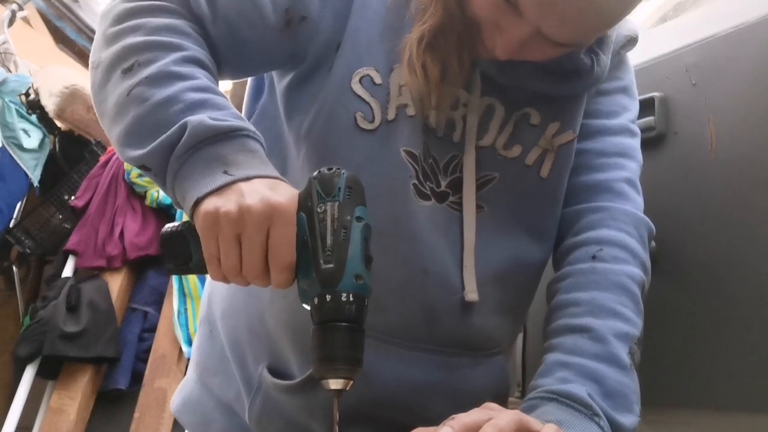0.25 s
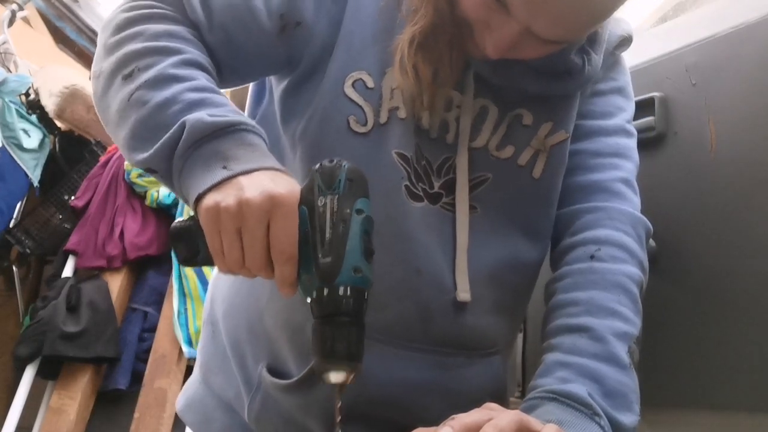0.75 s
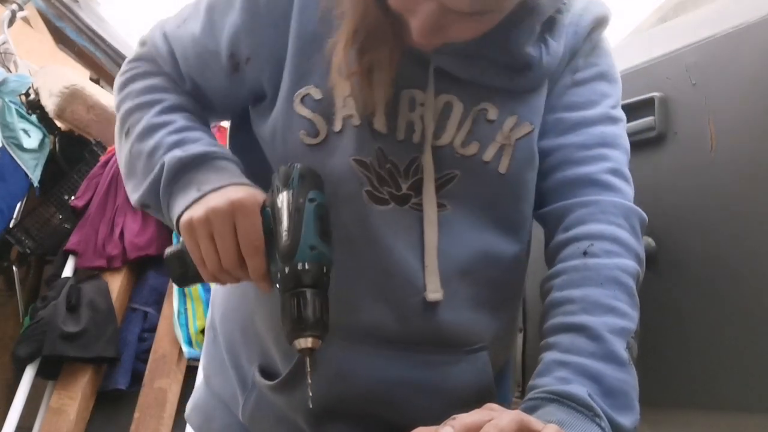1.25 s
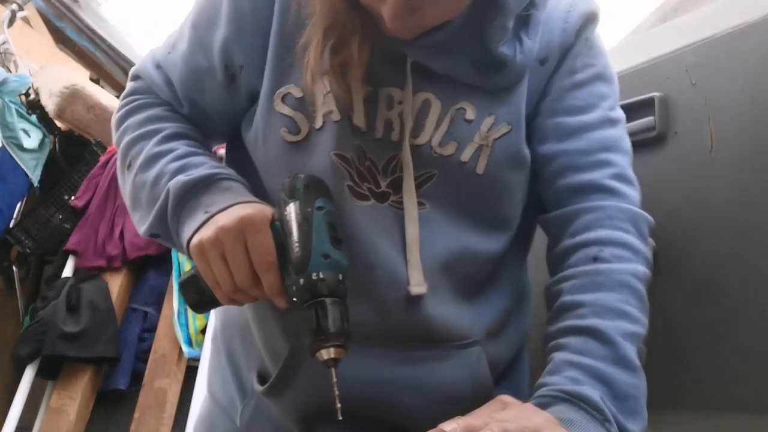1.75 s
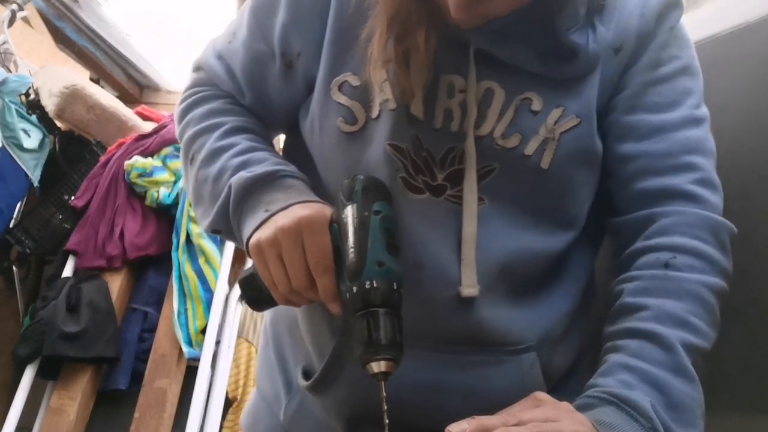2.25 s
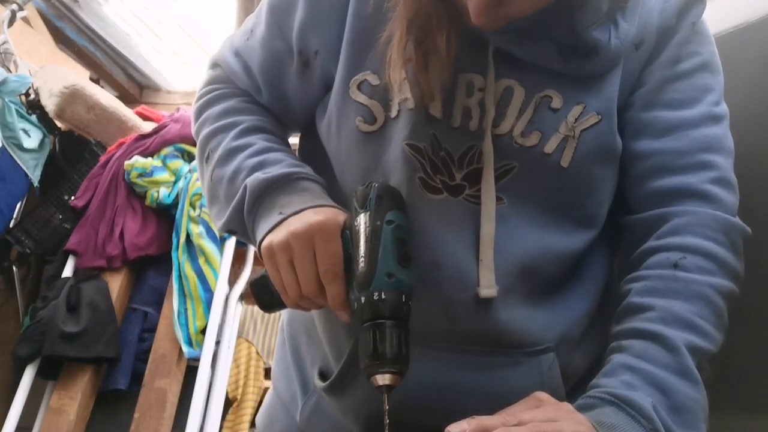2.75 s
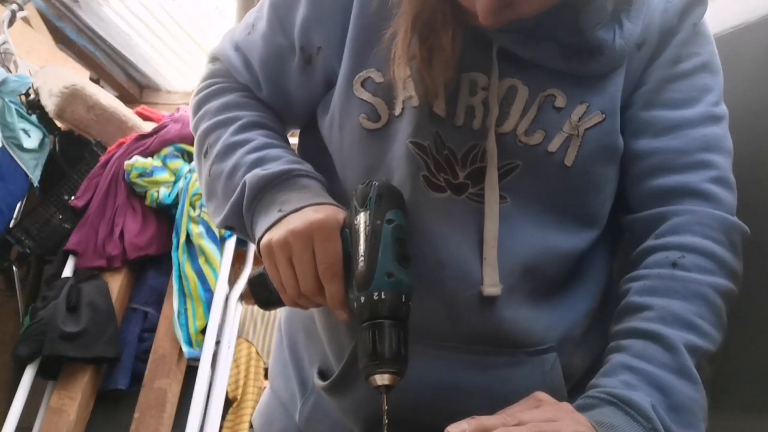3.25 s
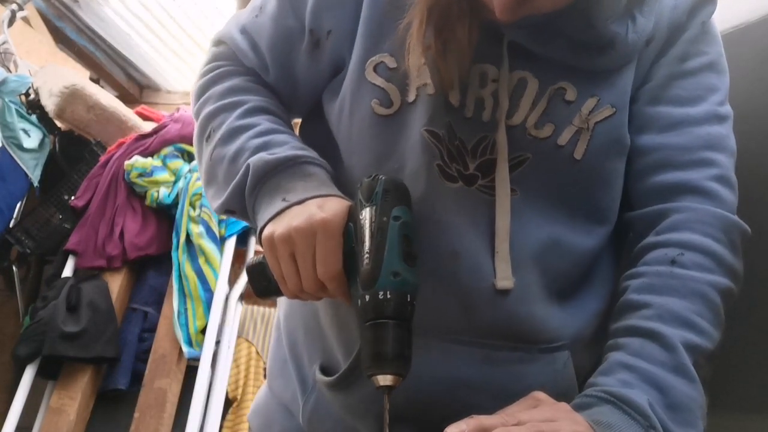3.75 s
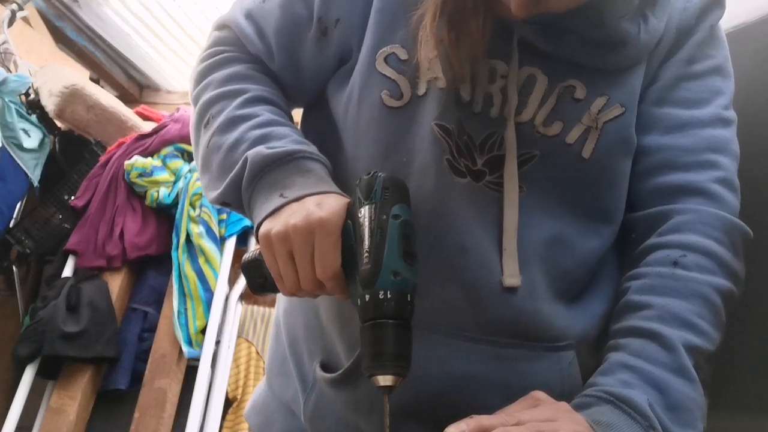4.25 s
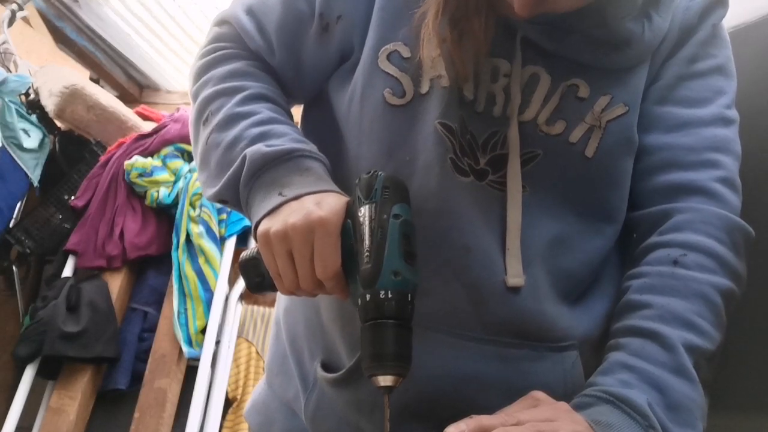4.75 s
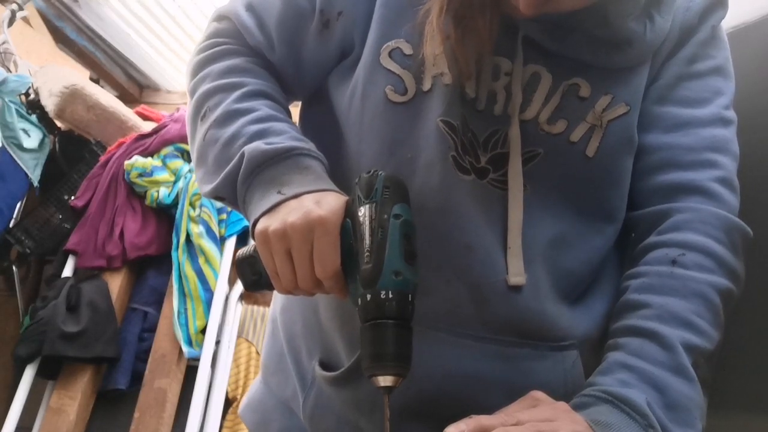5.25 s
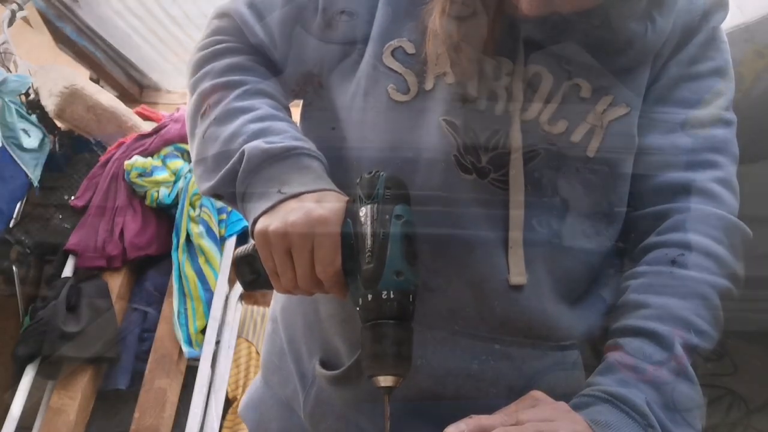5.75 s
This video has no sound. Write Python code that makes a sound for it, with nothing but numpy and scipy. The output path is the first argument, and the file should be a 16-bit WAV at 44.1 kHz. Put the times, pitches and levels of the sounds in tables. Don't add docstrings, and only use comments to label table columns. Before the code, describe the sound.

A hand drill blips three times against a metal panel, rests amid faint handling noises, then whines, skates and bites into the steel.

```python
import sys
import numpy as np
from scipy import signal
from scipy.fft import rfft, irfft, next_fast_len
from scipy.io import wavfile
from scipy.ndimage import uniform_filter1d

SR = 44100
rng = np.random.default_rng(int(sys.argv[2]) if len(sys.argv) > 2 else 0)


def store_wav(level_fs):
    pcm = np.round(np.clip(np.atleast_2d(level_fs), -1, 1) * 32767)
    wavfile.write(sys.argv[1], SR, pcm.T.astype(np.int16))


def convert_level_to_amplitude(level_db):
    exponent = np.asarray(level_db, float) / 20
    return 10 ** exponent


N = 265482
T = np.arange(N) / SR

# pull in seconds, release in seconds.
PULLS = [
    (.036, .264),
    (.343, .572),
    (.668, .897),
    (3.806, 6.1),
]
# lead over the pull in seconds, hiss level in dB, rise in seconds,
# panel rumble over the hiss in dB, fall after release in dB per second.
PULL_NOISE = [
    (-0.0014, -46.5, 0.053, 5, 610),
    (0.0096, -46.5, 0.044, 7, 333),
    (-0.01, -46.5, 0.04, 7, 339),
    (0.0048, -45.5, 0.11, -18.5, 500),
]
FREE_REV_PER_S, RUN_UP_S, BRAKE_REV_PER_S2 = 292, .066, 750
BLIPS_END_S, BITES_S = 2, 5.07

# time in seconds, pitch of three beats a turn in Hz, its level in dB.
ROTOR_LOADED = [(3.87, 852, -70), (3.91, 852, -55), (4.03, 848, -55), (4.15, 846, -48), (4.42, 835, -50),
                (4.65, 808, -55.5), (5.02, 785, -54.5), (5.25, 804, -63), (6.02, 779, -65)]
# beats a turn, level over the three-beat tone in dB, roughness as a share.
ROTOR_TONES = [(21, -9, .8), (6, -14, .6)]
# start, peak and end in seconds, level in dB.
ROTOR_WOBBLES = [
    (.87, 0.907, 1.085, -51.5),
    (4.847, 5.328, 6.4, -54.5),
]
# time in seconds, pitch in Hz, level in dB.
GEAR_MESH = [(3.92, 572, -62), (3.97, 579, -49.5), (4.12, 588, -47.5), (4.4, 580, -50), (4.7, 571, -50),
             (5.03, 561, -53), (5.1, 566, -61), (5.4, 580, -61), (6.02, 556, -68)]
# multiple of the mesh pitch, level in dB, roughness as a share.
GEAR_TONES = [(2.01, -1, .6), (2.5, 0, .3), (3, 1.5, .4), (3.43, .5, .35)]
GEAR_RATIO, GEAR_UPPER_DB = 8, -5
# beats a turn, mode in Hz, width in Hz, level in dB.
HOUSING_MODES = [(9, 1930, 63, -37.5), (9, 1300, 87, -82), (3, 650, 98, -51), (1, 330, 19, -18)]
MODE_PULL = .7

# pitch in Hz, level in dB per Hz.
BLIP_BODY = [(65, 6), (110, -4), (188, -11.5), (305, -2), (396, -9.5), (469, -17.5), (528, -4), (642, -15),
             (834, -5.5), (1110, -11.5), (1560, -13.5), (1920, -8), (2500, -15.5), (3250, -42),
             (5500, -120)]
# pitch in Hz, level in dB per Hz.
SKATE_BODY = [(110, 0), (150, -15), (300, -9), (450, -19), (600, -3.5), (700, -11.5), (1030, -8),
              (1200, -6.5), (1600, -2.5), (1800, 0.5), (2000, -1.5), (2170, -4.5), (2500, -6.5),
              (3200, -28)]
# pitch in Hz, level in dB per Hz.
BITE_BODY = [(65, -32), (110, 4.5), (160, -1.5), (210, -9), (271, -2), (380, -5), (469, -16), (571, -8),
             (651, -12.5), (792, -3.5), (976, -8.5), (1710, -3.5), (2500, -4.5), (3250, -50), (5500, -120)]
# pitch in Hz, level in dB per Hz.
BLIP_HISS = [(1470, -25), (2500, -2), (2740, 1.5), (3430, -6), (3850, 0.5), (4700, -1.5), (5190, -1.5),
             (5960, -5), (8690, -5), (10100, -19.5), (11500, -17), (12900, -17), (14200, -13), (15100, -15),
             (15700, -8.5)]
# pitch in Hz, level in dB per Hz.
BORE_HISS = [(1470, -37), (2500, -4.5), (2960, 0), (3220, -7), (3900, 0.5), (4420, -2.5), (5030, -2),
             (6150, -4), (7170, -2.5), (7800, -5), (8490, -3), (10400, -18.5), (15100, -14), (15700, -9)]
AIR_DB = [
    -5,
    -4,
    -3,
]
AIR_LAG_RISES, AIR_LAG_DB, AIR_RELEASE_DB = 0.56, -7, -6
BODY_DB = [
    3,
    0,
    -2.5,
]
RUN_UP_BODY_DB, RUN_UP_RUMBLE_DB = 6, 9
PRESS_SHARE = 0.24
BITE_RUMBLE_DB = 7
LIFT_S, LIFT_DB_PER_S, LIFT_BODY_SHARE = 0.763, 93, 0.31
FADE_S, FADE_DB_PER_S = 5.44, 10.5
CREEP_DB = -69

# start and end in seconds, pitch in Hz, level in dB, wobble in Hz.
SQUEALS = [(3.95, 4.05, 2400, -57, 12), (4.1, 4.78, 8235, -57, 15), (4.65, 4.92, 7500, -59, 20),
           (4.75, 5.25, 4905, -53, 7), (5.1, 5.6, 7500, -59, 15), (5.12, 5.55, 7670, -61, 12),
           (5.2, 5.48, 2397, -57, 15), (5.1, 5.75, 2908, -60, 20), (5.45, 6.3, 4920, -57, 8),
           (4.6, 5.4, 5230, -61, 20), (5.05, 5.4, 4825, -60, 15), (4.55, 4.8, 4930, -58, 12)]
# start and length in seconds, pitch in Hz, level in dB.
CHIRPS = [(.49, .04, 13800, -59), (.51, .04, 14800, -53), (.105, .04, 13800, -55), (.1, .04, 5500, -56),
          (.59, .025, 3750, -54), (.19, .03, 14800, -56), (.715, .02, 15000, -57), (.86, .015, 14900, -55),
          (.49, .025, 850, -49), (.095, .025, 1680, -49), (.235, .015, 4100, -53)]
CHIRP_WOBBLE_HZ, SQUEAL_SAG = 180, .006

# time in seconds, peak in dB, lowest and highest Hz, rise in milliseconds.
KNOCKS = [(.678, -48, 600, 6000, 1), (.885, -38, 1500, 10000, 3), (1.621, -46, 600, 3200, .4),
          (1.621, -62, 4000, 15000, .4), (2.003, -53.5, 4200, 8500, 6), (2.161, -43, 1000, 12000, 7),
          (2.167, -52, 200, 400, 10), (2.2, -51, 2300, 3500, 6), (2.202, -53, 5500, 16000, 5),
          (2.501, -65, 4000, 6500, 1), (3.822, -51, 1000, 12000, 1), (5.069, -40, 8000, 15500, 4),
          (5.4, -41, 13000, 15500, 4), (5.661, -39, 5000, 15000, 4), (1.422, -69, 5000, 8000, 1),
          (3.771, -68, 7800, 9200, 1), (.258, -42, 2000, 9000, 2), (.598, -47, 2500, 9500, 2),
          (.443, -33, 150, 900, 1), (.501, -36, 400, 6000, 1), (3.51, -74, 5000, 14000, 1)]
KNOCK_T60_S = 0.087
CRACK_GAIN, CRACK_S = 1.3, .002
# middle and length in seconds, level in dB.
BRUSHES = [(1.444, .05, -73), (1.586, .04, -80), (1.751, 0.33, -83), (1.929, 0.065, -68.5),
           (2.03, 0.085, -68), (2.129, 0.15, -69), (2.212, 0.027, -64), (2.5, 0.039, -78),
           (3.16, 0.041, -82), (3.51, .05, -85)]
# pitch in Hz, level in dB per Hz.
CLOTH_COLOUR = [(700, 4), (2500, 6), (5000, 2), (9000, 1), (10000, -8), (11500, -4), (13000, -6),
                (15700, -6)]
CLOTH_DB = -80.5

# time in seconds, pitch in Hz, level in dB.
ENGINE = [(0, 87.6, -49), (.2, 90.8, -60), (.53, 66.2, -55.5), (.82, 72.6, -62.5), (1.09, 74.3, -50),
          (1.28, 64.8, -53), (1.39, 65.4, -66), (1.48, 61.4, -53.5), (2.1, 56.8, -62.5), (2.43, 56, -51),
          (2.75, 56.26, -48.5), (3.82, 56.1, -62.5), (3.97, 65, -66), (4.19, 72.5, -54.5),
          (4.43, 67.5, -60.5), (5.25, 68, -49), (5.5, 67.3, -60), (5.85, 66.5, -52)]
# pitch in Hz, level in dB per Hz.
ROOM_COLOUR = [(53, 8), (90, 1), (249, 1), (322, -2), (383, -3), (466, -7.5), (591, -2.5), (702, -4.5),
               (765, -1), (1740, -4.5), (2260, -10), (4410, -13), (5000, -13.5), (5900, -25.5), (7400, -28),
               (8700, -21.5), (9800, -29), (15800, -48)]
ROOM_DB, ENGINE_THROB_DB, RUMBLE_DB, RUMBLE_SWING_DB = -63, 1.5, -61, 3

# pitch in Hz, level in dB per Hz.
CIRCUIT_COLOUR = [(30, 0.0), (59, -2.4), (119, -5.8), (238, -10.4), (474, -14.0), (947, -18.4),
                  (1889, -21.8), (3769, -27.5), (7519, -35.7), (15000, -31.2)]
CIRCUIT_DB, DUCK_DB, DUCK_S = -76.5, -5.5, .12
# pitch in Hz, level in dB per Hz.
NEXT_COLOUR = [(15, -12), (35, -2), (60, -3), (120, -9), (240, -13), (470, -22), (900, -20), (1900, -25.5),
               (4500, -30), (5300, -37), (9000, -39), (15000, -50)]
# time in seconds, level in dB.
NEXT_THUDS = [
    (5.925, -35),
    (5.96, -37),
    (5.996, -35),
]
NEXT_S, NEXT_FIRST_DB, NEXT_DB, NEXT_RISE_S = 5.7, -53, -45.5, .08


def whine():
    rev = rotor_speed()
    third_db = in_time(ROTOR_LOADED, -120)[1]
    out = convert_level_to_amplitude(third_db) * tone(3 * rev + 5 * drift(10), rough=.2)
    for start, peak, end, db in ROTOR_WOBBLES:
        swell = np.interp(T, [start, peak, end], [0, 1, 0]) ** 2
        out += convert_level_to_amplitude(db) * swell * tone(rev, rough=0.3)
    for order, db, rough in ROTOR_TONES:
        out += convert_level_to_amplitude(third_db + db) * tone(order * rev, rough)

    mesh = in_time(GEAR_MESH)[0] + 4 * drift(12)
    mesh_db = in_time(GEAR_MESH, -120)[1]
    beat = np.cos(2 * np.pi * np.cumsum(rev) / GEAR_RATIO / SR + drift(1.9))
    upper_db = mesh_db + GEAR_UPPER_DB + 3 * beat
    out += convert_level_to_amplitude(mesh_db + 2.5 * beat) * tone(mesh + 3 * drift(10), rough=.26)
    for multiple, db, rough in GEAR_TONES:
        out += convert_level_to_amplitude(upper_db + db) * tone(multiple * mesh, rough)

    driven = uniform_filter1d((since_pull()[2] == 0) * 1., size=400)
    driven = driven * np.where(T < BLIPS_END_S, 1, convert_level_to_amplitude(-3.5))
    for order, hz, width, db in HOUSING_MODES:
        push = order * rev
        nearness = np.exp(-((push - hz) / width) ** 2)
        out += convert_level_to_amplitude(db) * driven * nearness * tone(push + MODE_PULL * (hz - push), rough=0.1)
    return out


def rotor_speed():
    k, age, coasting = since_pull()
    top = np.where(T < BLIPS_END_S, FREE_REV_PER_S, in_time(ROTOR_LOADED)[0] / 3)
    run_up = 1 - np.exp(-np.maximum(age, 0) / RUN_UP_S)
    return np.maximum(top * run_up - BRAKE_REV_PER_S2 * coasting, 0)


def since_pull():
    pull, release = np.transpose(PULLS)
    k = np.maximum(np.searchsorted(pull, T + .03) - 1, 0)
    return k, T - pull[k], np.maximum(T - release[k], 0)


def stage():
    return (T >= BLIPS_END_S) * 1 + (T >= BITES_S)


def grind():
    blip = T < BLIPS_END_S
    turn = 1 + 0.022 * np.cos(2 * np.pi * np.cumsum(rotor_speed()) / SR)
    contacts = rng.standard_normal(N) * convert_level_to_amplitude(1.3 * rng.exponential(1, N)) * turn
    contacts = sheet_modes(contacts, depth_db=2.1, width_hz=60)
    low_bore = np.where(T < BITES_S, coloured(contacts, SKATE_BODY), coloured(contacts, BITE_BODY))
    low = np.where(blip, coloured(contacts, BLIP_BODY), low_bore)
    high = np.where(blip, coloured(contacts, BLIP_HISS), coloured(contacts, BORE_HISS))
    hiss_db, air_db, body_db, rumble_db = noise_levels()
    shake_db = np.where(blip, 1.5, .5) * drift(32)
    ranges = [(air_db, high, 9500, 16500, 4), (0, high, 2500, 9500, 6),
              (body_db, low, 500, 2500, 4), (rumble_db, low, 110, 500, 2)]
    out = 0
    for db, source, low_hz, high_hz, count in ranges:
        edges = np.geomspace(low_hz, high_hz, count + 1)
        part = 0
        for k, (a, b) in enumerate(zip(edges, edges[1:])):
            flicker = convert_level_to_amplitude(np.where(blip, 1.6, .55) * drift(5.6))
            part = part + flicker * band(source, a, b) * (-1) ** k
        usual = np.array([part[stage() == k].std() for k in range(3)])
        out = out + convert_level_to_amplitude(hiss_db + db + shake_db) * part / usual[stage()]
    return out


def noise_levels():
    k, age, coasting = since_pull()
    lead, db, rise, rumble_db, release = np.array(PULL_NOISE)[k].T
    age = np.maximum(age + lead, 0)
    blip = T < BLIPS_END_S

    swell = 1 - np.exp(-(age / rise) ** np.where(blip, 1.7, 1))
    fade_db = FADE_DB_PER_S * np.maximum(T - FADE_S, 0)
    hiss_db = db + 20 * np.log10(swell + 1e-6) - release * coasting - fade_db
    tails = [np.where(T < off, -200, row[1] - row[-1] * (T - off)) for row, (on, off) in zip(PULL_NOISE, PULLS)]
    creep_db = np.where((T > PULLS[0][1]) & (T < PULLS[2][1]), CREEP_DB, -200)
    hiss_db = np.max([hiss_db, *tails, creep_db], axis=0)

    air_db = np.array(AIR_DB)[stage()] + AIR_LAG_DB * np.exp(-age / rise / AIR_LAG_RISES)
    air_db = air_db + AIR_RELEASE_DB * (coasting > 0)

    lifted_db = LIFT_DB_PER_S * np.clip(T - LIFT_S, 0, .1) * blip
    body_db = np.array(BODY_DB)[stage()] + RUN_UP_BODY_DB * np.exp(-age / 0.064)
    body_db = body_db - LIFT_BODY_SHARE * lifted_db + PRESS_SHARE * (rumble_db - 5.5) * blip

    run_up_db = RUN_UP_RUMBLE_DB * np.exp(-age / 0.1) * (T > BLIPS_END_S)
    bite_db = BITE_RUMBLE_DB * np.clip(1 + (T - BITES_S) / 0.38, 0, 1)
    return hiss_db, air_db, body_db, rumble_db + run_up_db + bite_db - lifted_db


def sheet_modes(x, depth_db, width_hz):
    size = next_fast_len(N)
    span = max(int(width_hz * size / SR), 1)
    ripple = uniform_filter1d(rng.standard_normal(size // 2 + 1), span)
    ripple = rms_one(uniform_filter1d(ripple, span))
    return irfft(rfft(x, size) * convert_level_to_amplitude(depth_db * ripple), size)[:N]


def squeals():
    chirps = [(s, s + length, hz, db, CHIRP_WOBBLE_HZ) for s, length, hz, db in CHIRPS]
    out = 0
    for start, end, hz, db, wobble_hz in SQUEALS + chirps:
        share = np.clip((T - start) / (end - start), 0, 1)
        swell = np.sqrt(np.abs(np.sin(np.pi * share))) * (share < 1)
        rough = min(.25 + wobble_hz / 60, 1.5)
        out = out + convert_level_to_amplitude(db) * swell * tone(hz * (1 - SQUEAL_SAG * share), rough, wobble_hz)
    return out


def knocks():
    grains = rng.standard_normal(N) * convert_level_to_amplitude(1.5 * rng.exponential(1, N))
    cloth = convert_level_to_amplitude(CLOTH_DB)
    for s, length, db in BRUSHES:
        cloth = cloth + convert_level_to_amplitude(db) * np.exp(-(2 * (T - s) / length) ** 2)
    out = cloth * convert_level_to_amplitude(drift(30)) * coloured(grains, CLOTH_COLOUR)
    for s, db, low_hz, high_hz, rise_ms in KNOCKS:
        age, rise = np.maximum(T - s, 0), rise_ms / 1000
        decay = convert_level_to_amplitude(db - 60 * np.maximum(age - rise, 0) / KNOCK_T60_S)
        crack = 1 + CRACK_GAIN * (rise_ms < 1.5) * np.exp(-age / CRACK_S)
        burst = rms_one(band(grains, low_hz, high_hz)) / 2
        out += decay * np.minimum(age / rise, 1) * crack * burst
    return out


def garage():
    hz, drone_db = in_time(ENGINE)
    room = convert_level_to_amplitude(ROOM_DB + 1.3 * drift(1.9)) * coloured(rng.standard_normal(N), ROOM_COLOUR)
    low_noise = rms_one(band(rng.standard_normal(N), 11.4, 65, order=3))
    rumble = convert_level_to_amplitude(RUMBLE_DB + RUMBLE_SWING_DB * drift(2.8)) * low_noise
    engine = convert_level_to_amplitude(drone_db + ENGINE_THROB_DB * drift(9.0)) * tone(hz, .22, wobble_hz=6)
    return room + rumble + engine


def left_input():
    running = 0
    for on, off in PULLS:
        running = running + np.clip((T - on) / .1, 0, 1) * np.clip(1 - (T - off) / DUCK_S, 0, 1)
    hiss_db = CIRCUIT_DB + DUCK_DB * np.minimum(running, 1)
    out = convert_level_to_amplitude(hiss_db) * coloured(rng.standard_normal(N), CIRCUIT_COLOUR)
    level_db = np.interp(T, [NEXT_S, NEXT_S + NEXT_RISE_S], [NEXT_FIRST_DB, NEXT_DB])
    fade_in = np.clip((T - NEXT_S) / .006 + 1, 0, 1)
    out += convert_level_to_amplitude(level_db) * fade_in * coloured(rng.standard_normal(N), NEXT_COLOUR)
    for s, db in NEXT_THUDS:
        out -= convert_level_to_amplitude(db) * np.exp(-((T - s - .005) / .0025) ** 2)
    return out


def rms_one(x):
    return x / np.sqrt(np.mean(x ** 2) + 1e-20)


def in_time(rows, outside=None):
    s, *columns = np.transpose(rows)
    return [np.interp(T, s, c, outside, outside) for c in columns]


def drift(rate):
    r = np.exp(-40 * np.pi * min(rate, 400) / SR)
    slow = signal.lfilter([1], [1, -2 * r, r * r], rng.standard_normal(N // 20 + 4002))[4000:]
    return np.interp(np.arange(N) / 20, np.arange(len(slow)), rms_one(slow))


def band(x, low_hz, high_hz, order=2):
    sos = signal.butter(order, [low_hz, min(high_hz, SR / 2.2)], "band", fs=SR, output="sos")
    return signal.sosfilt(sos, x)


def coloured(x, spectrum):
    hz, db = np.transpose(spectrum)
    size = next_fast_len(N)
    log_hz = np.log(np.arange(size // 2 + 1) * SR / size + 1)
    gain = convert_level_to_amplitude(np.interp(log_hz, np.log(hz), db))
    return rms_one(irfft(rfft(x, size) * gain, size)[:N])


def tone(hz, rough, wobble_hz=25):
    wave = np.exp(2j * np.pi * np.cumsum(hz) / SR)
    waver = 1 + rough * (drift(wobble_hz) + 1j * drift(wobble_hz))
    return np.sqrt(2 / (1 + 2 * rough ** 2)) * np.real(wave * waver)


def scene():
    right = 2 * (whine() + grind() + squeals() + knocks() + garage())
    return np.array([left_input(), right])


def band_limit(x):
    return signal.sosfilt(signal.butter(12, 16340, fs=SR, output="sos"), x)


def record(dry):
    low_pass = signal.ellip(12, .3, 80, 15720, fs=SR, output="sos")
    mix = signal.sosfilt(low_pass, dry)
    return band_limit(mix)


dry = scene()
out = record(dry)
store_wav(out)
```